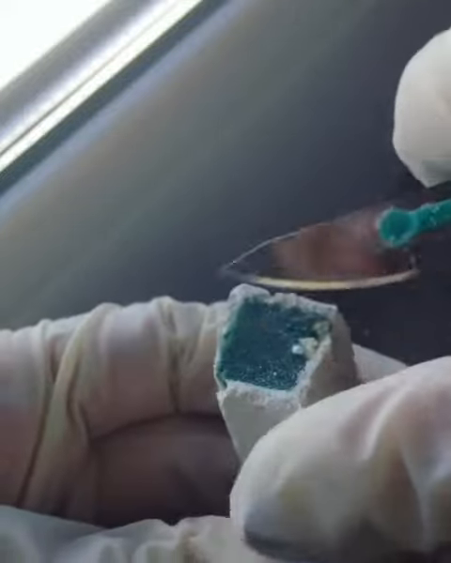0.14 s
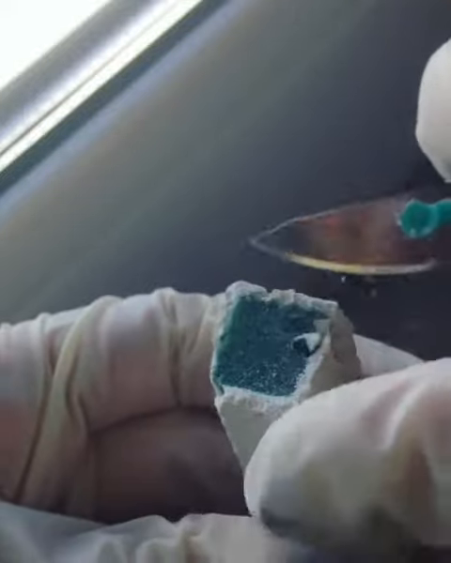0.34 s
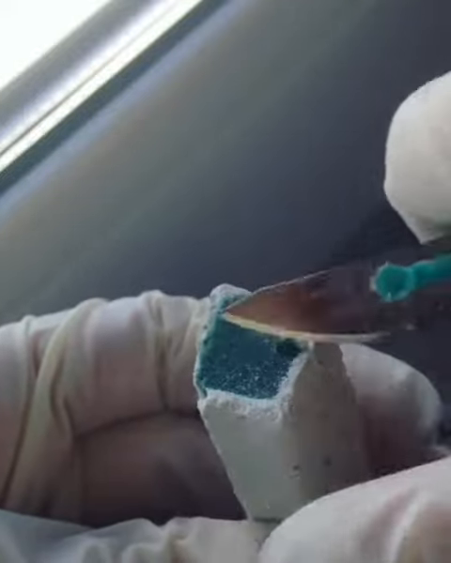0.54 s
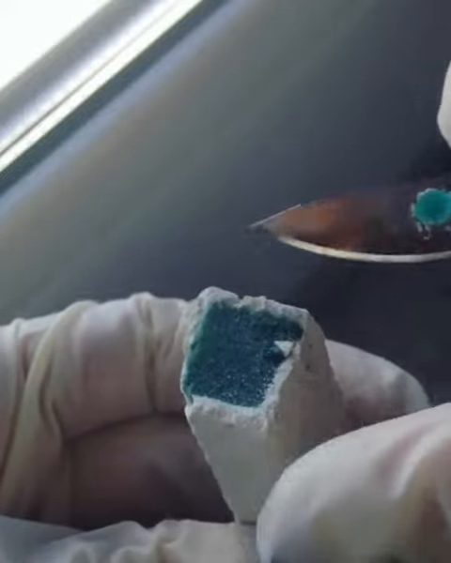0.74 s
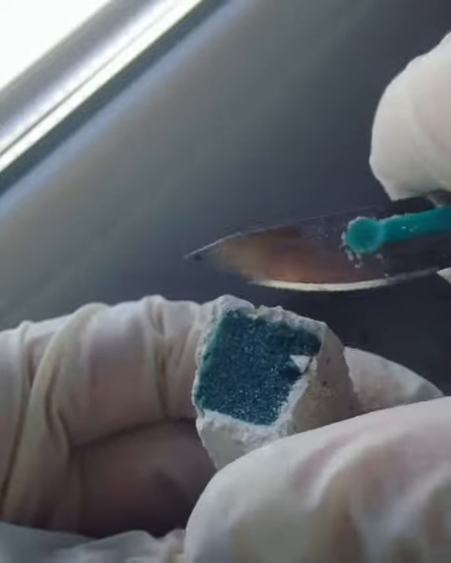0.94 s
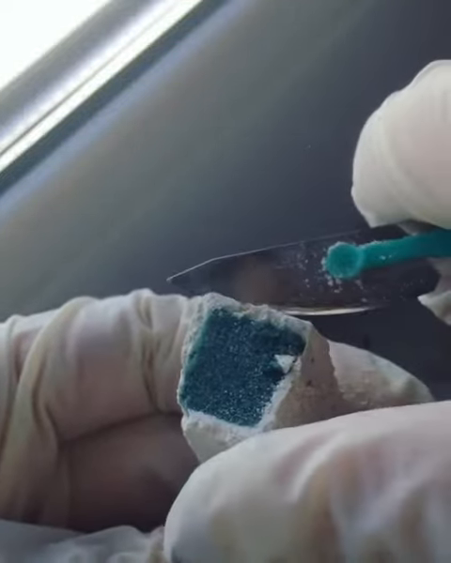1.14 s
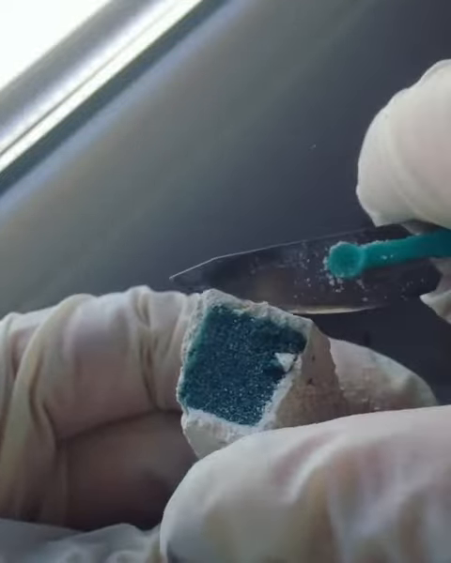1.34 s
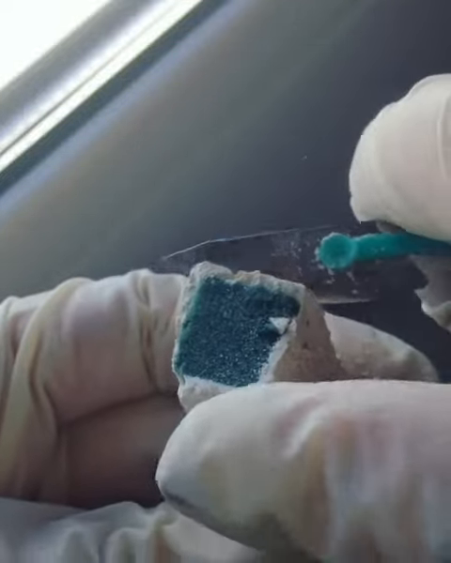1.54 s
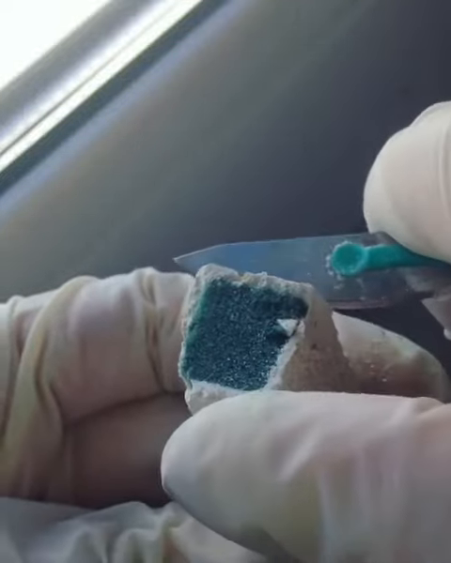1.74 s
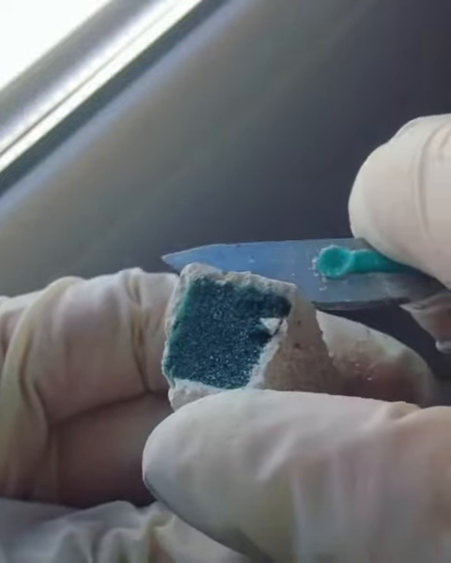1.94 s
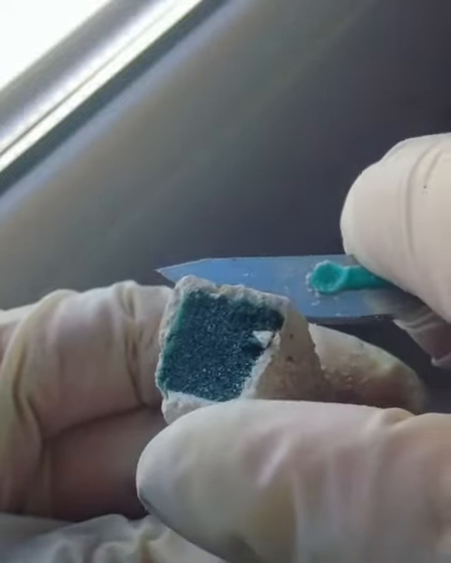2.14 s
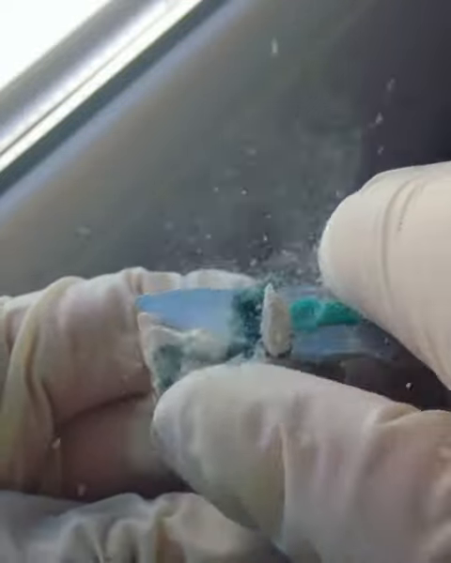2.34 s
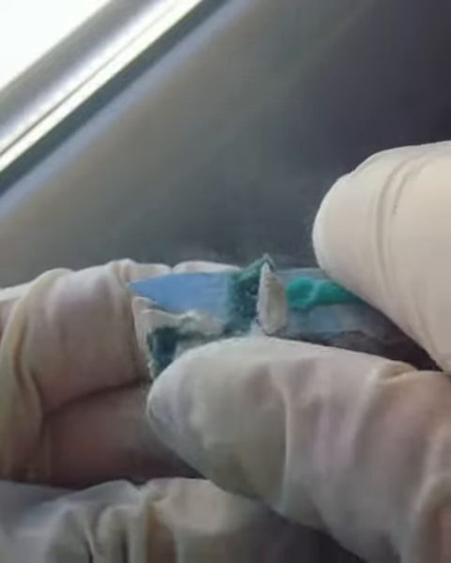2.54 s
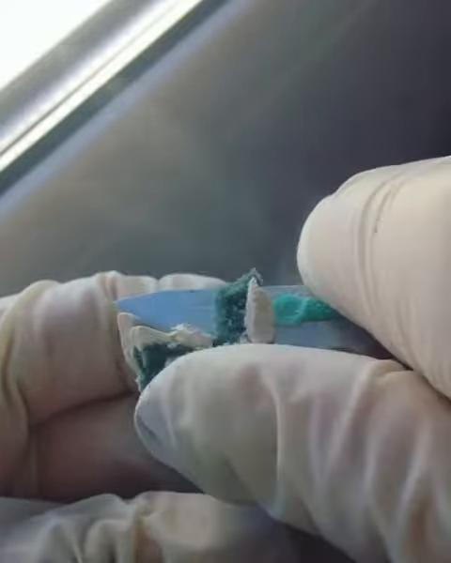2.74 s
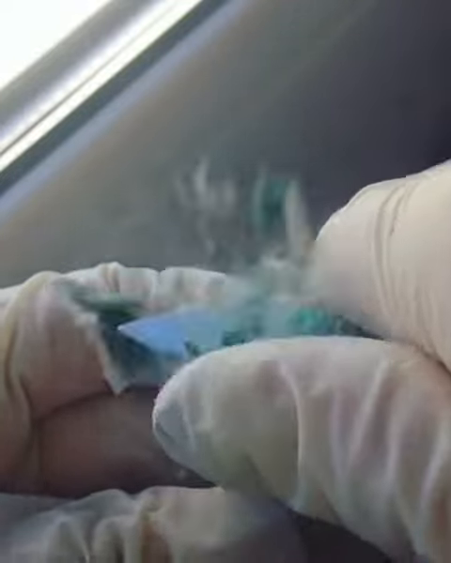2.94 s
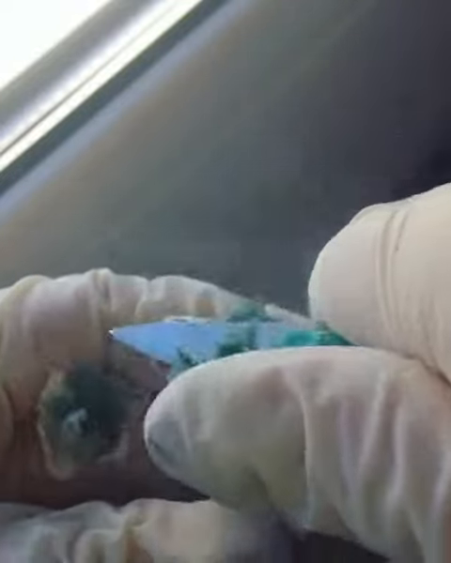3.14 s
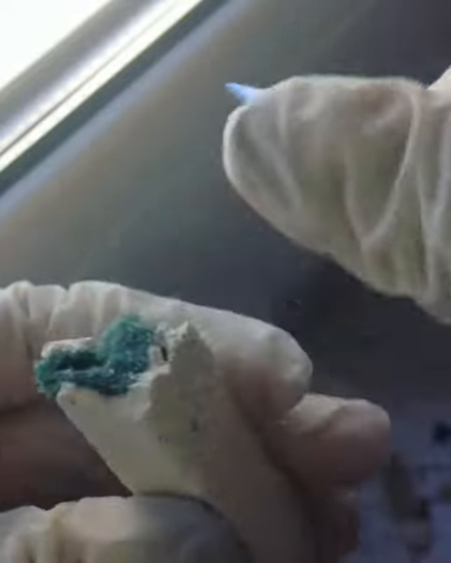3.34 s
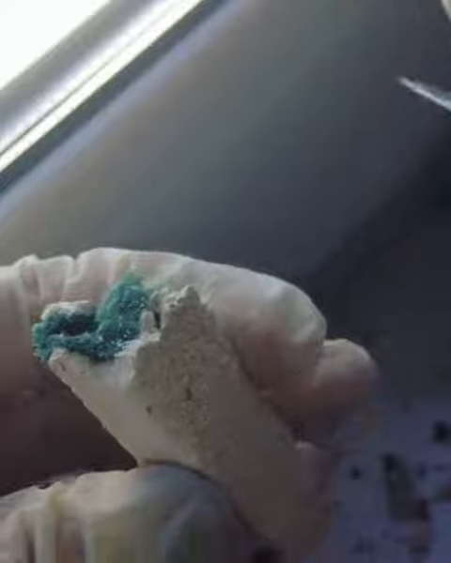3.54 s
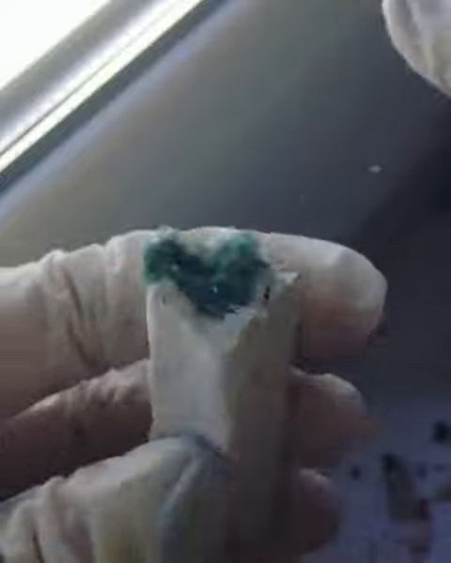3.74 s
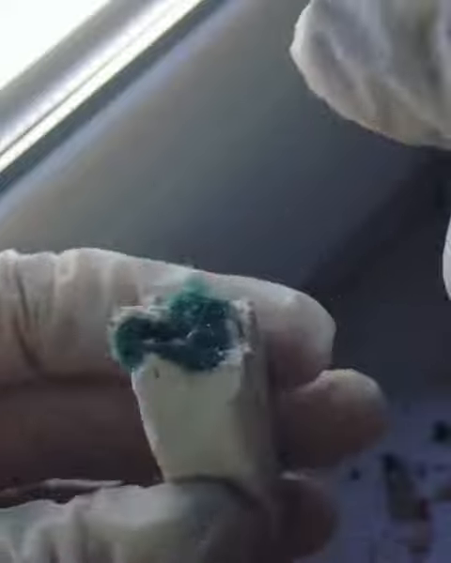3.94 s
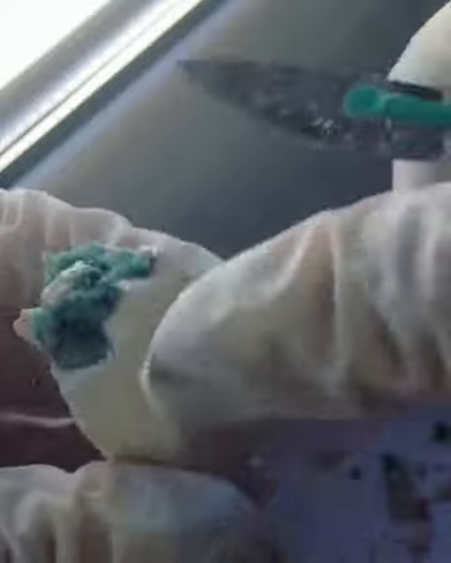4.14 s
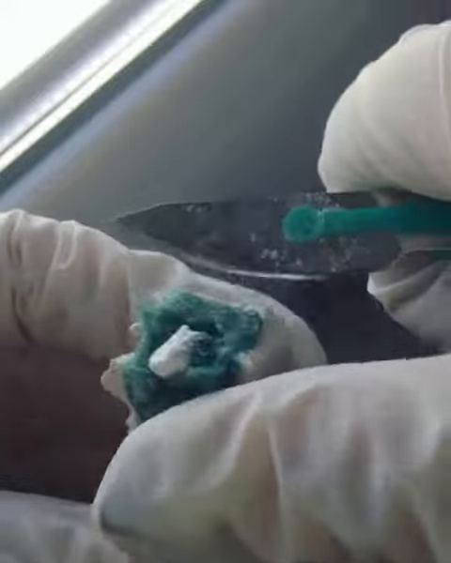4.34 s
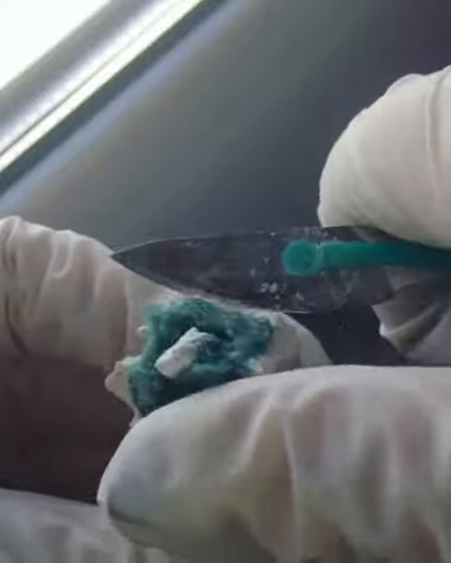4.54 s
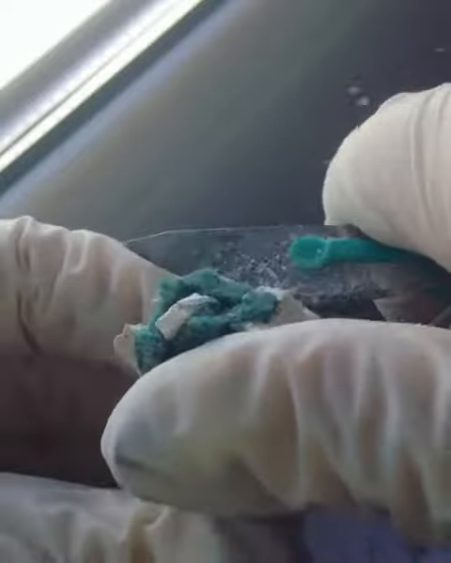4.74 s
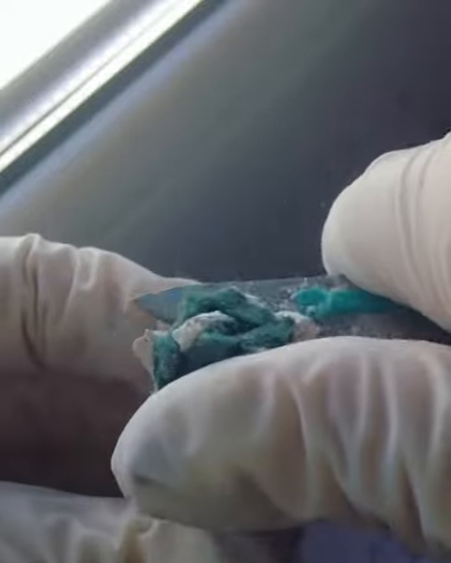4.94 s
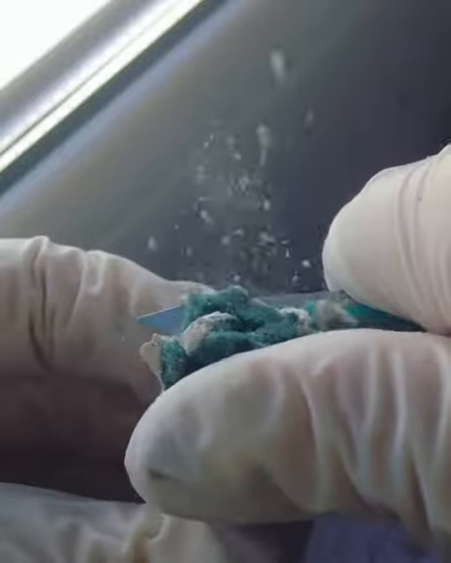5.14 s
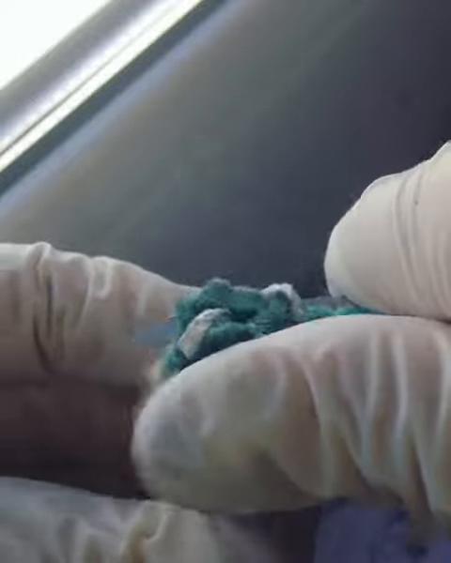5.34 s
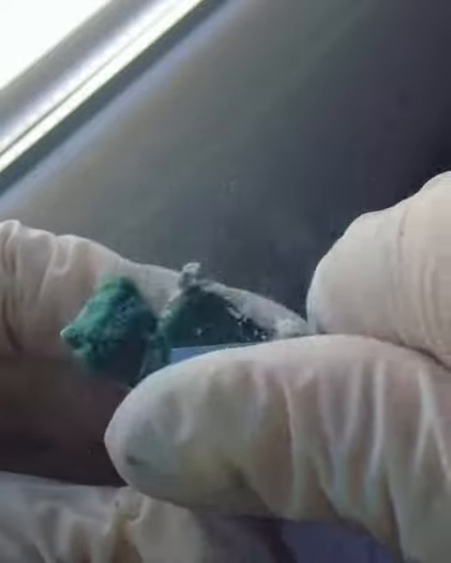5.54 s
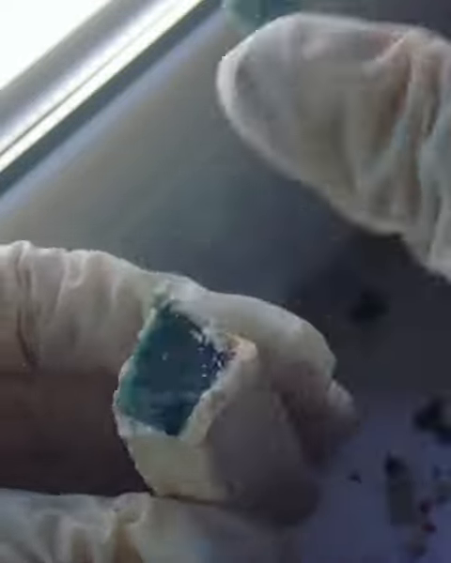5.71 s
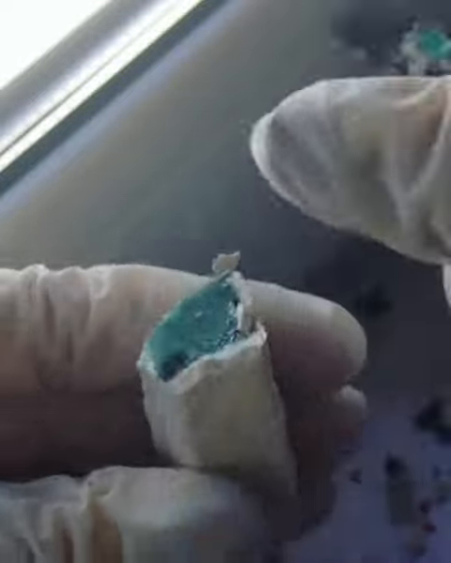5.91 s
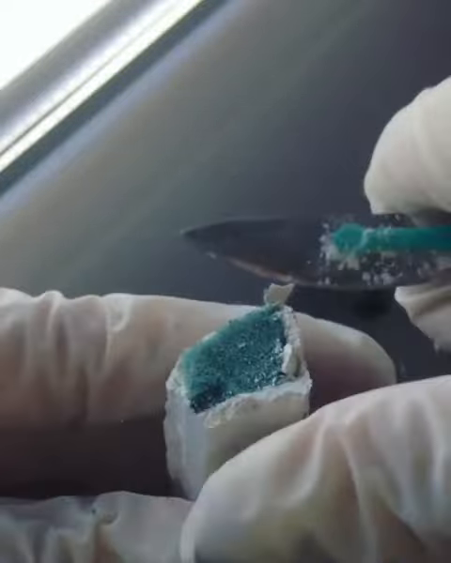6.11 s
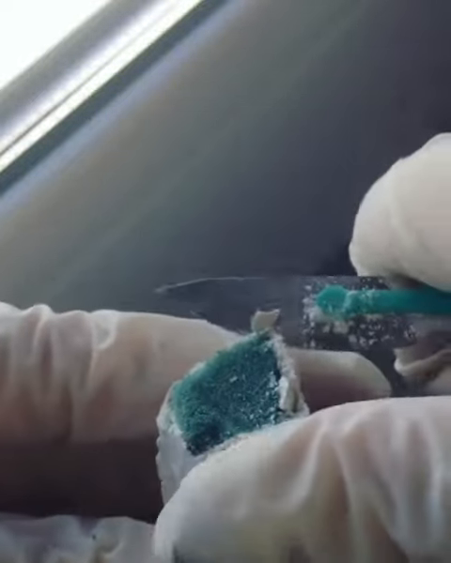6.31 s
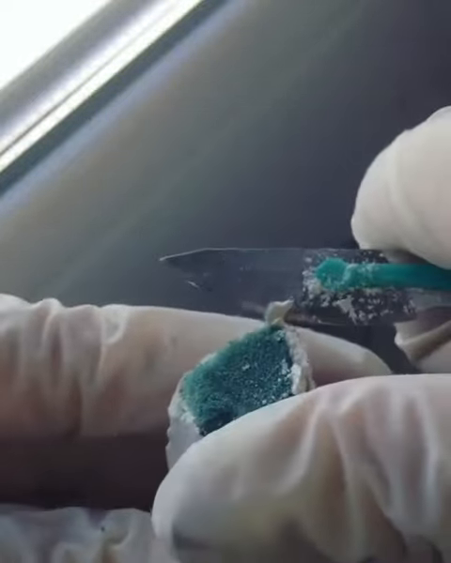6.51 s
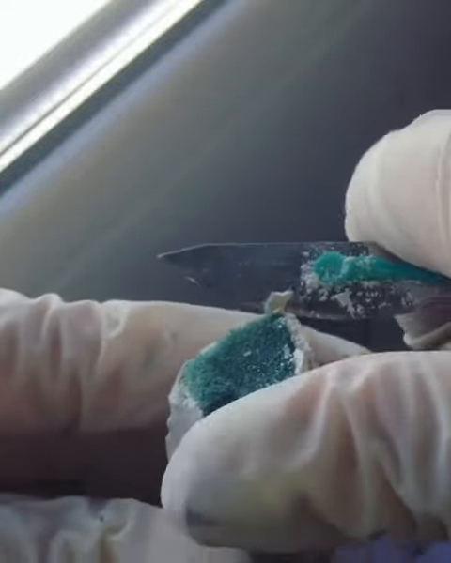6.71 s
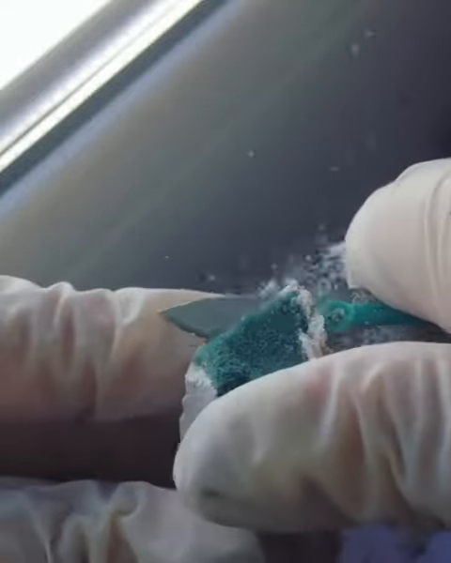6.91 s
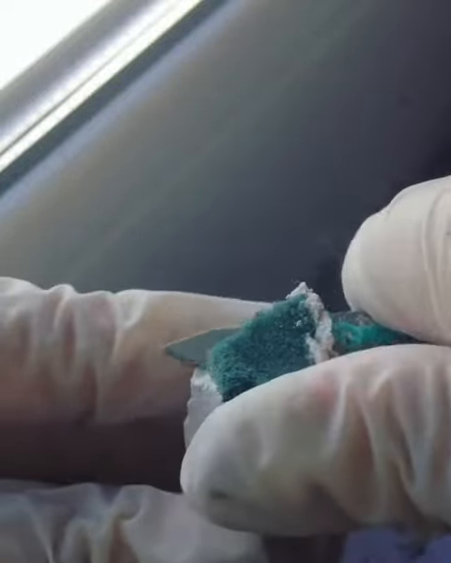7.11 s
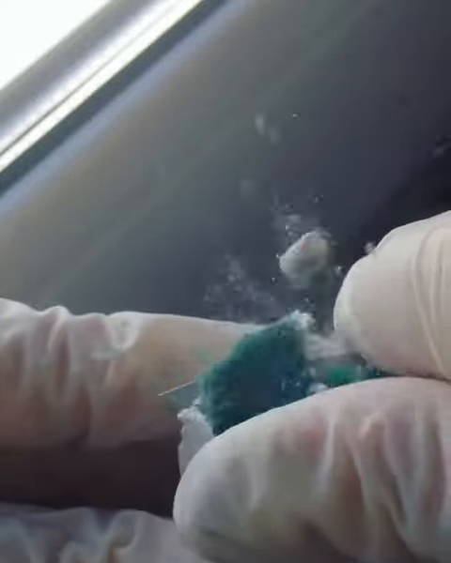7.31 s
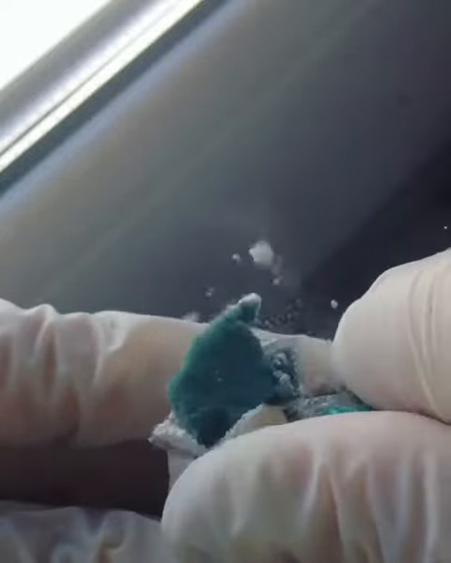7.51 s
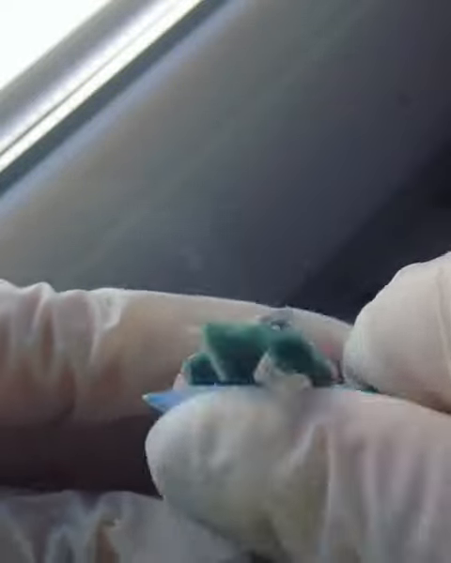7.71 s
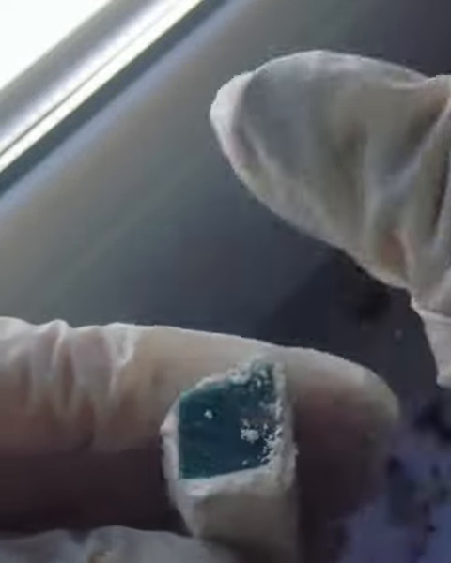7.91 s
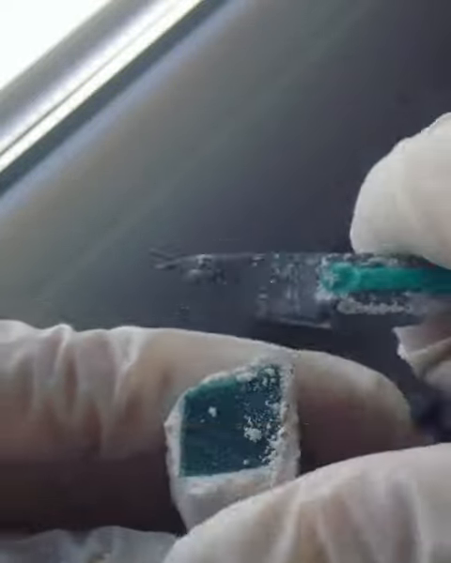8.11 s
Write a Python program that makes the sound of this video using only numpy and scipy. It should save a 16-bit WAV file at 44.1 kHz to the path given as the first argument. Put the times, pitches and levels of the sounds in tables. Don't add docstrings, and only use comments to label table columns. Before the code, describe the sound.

A close microphone in a quiet, dry room with faint low rumble, soft hiss and barely audible hum. In the first 0.8 s a thin blade makes four short, bright scratchy shaves on a dry block, with tiny ticks. Near silence follows, only faint flecks until 2.4. At 2.5 a hard, crisp double crack bursts out, grit spilling, with a tiny glassy clink at 2.6; another sharp crack at 3.1 sends crumbs tapping and rolling to 3.6, and a low handling bump comes at 3.75. After a lull, a very sharp snap at 4.87 starts crackling and squeezed grit up to a crunch at 5.55. Pieces clatter and roll around 5.8, a dull hollow knock at 5.95, then sparse taps and a very faint sinking pipe tone near 6.7. From 6.9 to 7.7 dense brittle crunches resume, then bright taps at 7.8-7.9 and trickling crumbs to the end, about 8.4.

```python
import sys
import numpy as np
from scipy import signal
from scipy.io import wavfile
from scipy.ndimage import uniform_filter1d

SR = 44100
rng = np.random.default_rng(int(sys.argv[2]) if len(sys.argv) > 2 else 0)


def transcribe(signal):
    frames = np.atleast_2d(signal).T
    limited = np.clip(frames, -1, 1)
    pcm = np.round(limited * 32767).astype(np.int16)
    wavfile.write(sys.argv[1], SR, pcm)


def elevation(decibels):
    levels = np.asarray(decibels, float)
    return 10 ** (levels / 20)


N = 364266

# time_s, level_db
RUMBLE_LEVEL = [(0, -69), (.35, -75), (.8, -71.5), (2.2, -73), (2.7, -69), (3.72, -68.5), (3.8, -52.5),
                (4.05, -68.5), (4.4, -72), (5.0, -70), (8.26, -68.5)]
# frequency_hz, density_db
RUMBLE_COLOUR = [(12, -50), (20, -19.5), (91, -5.5), (164, -6.5), (268, -10.5), (387, -15.5), (900, -32.5),
                 (1980, -120)]
# frequency_hz, density_db
HISS_COLOUR = [(240, -33.5), (400, -4.5), (1690, -15), (2120, -15), (7170, -15.5), (12600, -26),
               (14000, -19.5)]
# pitch_hz, waver_hz, level_db
HUM_TONES = [(168, 3, -74), (219.5, 7, -79)]

# start_s, bite_s (time to full bite), level_db, length_s, lift_off_db
STROKES = [
    (0.008, 0.0021, -46.5, 0.042, -59),
    (0.094, 0.066, -48.5, 0.11, -65),
    (0.448, 0.011, -44, 0.071, -54.5),
    (0.717, 0.016, -47, 0.083, -49.5),
]
# middle_s, level_db, length_ms
CATCHES = [(0.01, -53, 3.7), (0.019, -41.5, 2.3), (0.037, -56, 1.9), (0.097, -59, 2.1), (0.109, -57, 2),
           (0.119, -56, 2), (0.139, -50, 4), (0.164, -47, 8.6), (0.186, -34.5, 5), (0.462, -39, 1.5),
           (0.471, -33.5, 1.2), (0.478, -42, 2), (0.489, -50, 4), (0.501, -52, 2), (0.504, -51, 0.64),
           (0.509, -42, 3.9), (0.72, -56, 2), (0.74, -37, 1.6), (0.744, -38, 1), (0.767, -45, 2.3),
           (0.775, -27, 1.4), (0.787, -38.5, 3.2), (0.03, -49, 8.8), (0.235, -72, 42), (0.815, -70, 23),
           (0.54, -80, 33)]
# pitch_hz, width_hz, level_db
BLADE_MODES = [(3700, 330, -10.5), (4800, 540, -5.5), (6900, 260, 1), (7700, 690, 0), (9000, 890, -10.5),
               (11270, 270, -3.5), (12600, 600, -12), (13600, 400, -12)]
TOUCH_DB, EDGE_S = -19, 0.0039
LIFT_DB, AFTER_S, AFTER_DB = -73, 0.1, -89

# frequency_hz, density_db
FINE_COLOUR = [(900, -45), (1800, -24), (3400, -14), (6200, -4), (9200, -1), (11000, 0), (14000, -3)]
# frequency_hz, density_db
COARSE_COLOUR = [(60, -52), (250, -5.5), (600, -6), (1300, -3), (2200, -1), (3500, 3.5), (6000, 2),
                 (12000, -21)]
# frequency_hz, density_db
EDGE_COLOUR = [(1500, -38), (4000, 3), (6500, 11), (9000, 3), (12500, 0.5), (15000, -10.5)]

# start_s, peak_db, ring_hz, edge_db (relative), body_db (relative)
SNAPS = [(4.7401, -33, 9260, 1, -13.5), (4.8654, -5, 10130, -21, -23), (4.897, -29, 9670, -18, -25),
         (4.964, -18, 9700, -2, -2.5), (5.0111, -38.5, 3380, 15.5, 9), (5.0281, -31, 3230, 16, 6),
         (5.0325, -22, 9170, 11, 2.5), (5.1952, -34, 9000, 0, -19), (5.292, -16, 9000, 6, 3.5),
         (5.4338, -30, 10700, 2.5, -43.5), (6.9158, -32.5, 11500, 14.5, 10), (7.238, -32, 9500, -6, -19),
         (7.249, -32, 2800, -10, 4.5), (7.4565, -16.5, 8000, 9.5, 7), (7.5085, -39, 10000, 5.5, -19),
         (7.6014, -19, 8000, 2, 3), (7.6593, -21, 7600, -3, 3), (7.721, -23, 7840, 1.5, -3.5)]
# start_s, peak_db, ring_hz, edge_db (relative), body_db (relative)
CRACKS = [(0.4694, -24.5, 7240, -15, -32), (0.7856, -28, 8450, -9, -25), (2.4676, -11, 11700, 5, -5),
          (2.5153, -18.5, 2900, 6, -6), (2.484, -13, 10900, -11, -20), (3.1255, -26, 3580, 10, 7.5),
          (3.1272, -8.5, 6740, 2, -9.5), (5.5465, -12, 9000, 4.5, 3.5), (5.5649, -27.5, 5550, -4, -20),
          (7.0382, -15, 10300, 4.5, -4), (7.0796, -15, 11000, 4, -6), (7.1884, -30, 9050, 9.5, 5.5),
          (7.2556, -28, 9300, -2, -10)]
# start_s, peak_db, ring_hz, edge_db (relative), body_db (relative)
CRUNCHES = [(0.0154, -31, 6500, -12, -13), (0.1817, -37, 3520, -14, -13), (0.4607, -31.5, 4700, -2, -26),
            (0.5082, -31, 7700, 0.5, -32), (0.7385, -28, 10000, -1, -21), (0.7741, -22.5, 4700, 3, -17.5),
            (1.4554, -32.5, 6900, -38, -16), (2.4821, -12, 3110, 7.5, -8), (2.5389, -46, 10060, -9, -18),
            (6.9959, -23, 9500, 5, 2), (7.2649, -41, 2960, -6, 4.5), (7.2868, -36, 1396, -11, 6),
            (7.2962, -30.5, 9900, -2, -23), (7.4313, -27.5, 12100, -11, -17), (7.6711, -26, 8700, 9.5, 2)]
# start_s, peak_db, ring_hz
FLECKS = [(0.416, -48, 6700), (0.9731, -44, 6500), (1.016, -49, 8400), (1.088, -59, 2960),
          (1.249, -58, 3330), (1.5626, -49, 4100), (1.697, -56.5, 6500), (1.774, -56, 3400),
          (2.432, -49, 3200), (5.078, -40, 6000)]
SNAP_MS, CRACK_MS, CRUNCH_MS = 2.1, 2.63, 4.6

# start_s, fine_db, coarse_db, t60_s
POURS = [(2.483, -38.5, -37, 0.25), (2.634, -66, -66, 2.3), (2.633, -54, -58, .09), (5.79, -62, -54, 0.31),
         (2.73, -54.5, -48, 0.45), (3.129, -48.5, -46.5, 0.34), (3.313, -61.5, -58, 0.98),
         (3.483, -67, -56, 0.53), (3.757, -61, -49, 0.47), (4.871, -49, -58.5, 0.21),
         (4.969, -57, -62, 1.1), (5.298, -67, -65.5, 3.5), (5.435, -37.5, -47.5, 0.22),
         (5.551, -42, -44, 0.2), (5.775, -60, -51.5, 0.78), (5.994, -63.5, -61.5, 1.4),
         (6.922, -67, -62, 0.35), (7.002, -59, -83, .8), (7.19, -48.5, -75, 0.49), (7.458, -42, -45, 0.18),
         (7.607, -62, -59.5, 0.63), (7.663, -43, -41.5, 0.14), (7.798, -68, -58, 1.15),
         (7.877, -61, -52, 0.33), (8.188, -61, -55.5, 2.8)]
# middle_s, fine_db, coarse_db, half_width_s
SWELLS = [(1.08, -69, -72.5, 0.082), (1.69, -76, -76.5, 0.3), (2.46, -72, -83, 0.16),
          (3.1, -69.5, -96, 0.39), (3.62, -67.5, -61.5, 0.85), (3.9, -62, -62.5, 0.12),
          (4.219, -70, -70, 0.85), (4.799, -73.5, -73, 0.53), (5.063, -46.5, -64, 0.072),
          (5.18, -49, -68, 0.09), (5.76, -62.5, -60, 0.1), (6.345, -77, -66.5, 0.027),
          (6.415, -63, -62, 0.061), (6.532, -69, -63, .15), (7.08, -57, -63, 0.21),
          (7.254, -47, -48.5, 0.047), (7.44, -65.5, -65, 0.94), (7.734, -55, -51, 0.045),
          (8.055, -64, -64, 0.072), (8.14, -66, -64.5, 0.17), (0.23, -75, -69, 0.13),
          (0.83, -74, -68.5, 0.12), (5.49, -45, -77, 0.083), (3.39, -66, -53, 0.033),
          (6.33, -66.5, -63, .015), (6.57, -71, -65, 0.035), (7.3, -53.5, -52.5, 0.035)]
# pitch_hz, width_hz, level_db
CRUMB_MODES = [(1320, 210, -6), (2150, 75, 2), (2950, 430, -2)]
POUR_RISE_S, EBB_DB, DUST_DB = .006, -21.5, -86.5

# start_s, peak_db, ring_hz
CHIPS = [(0.3057, -62, 8950), (2.701, -57, 4010), (2.737, -35, 6500), (2.83, -38, 8000),
         (2.987, -54, 10800), (3.039, -53, 10700), (3.256, -51, 2420), (3.276, -52, 3010),
         (3.323, -43, 490), (3.388, -39, 6400), (3.488, -29.5, 2100), (3.513, -42, 2100),
         (3.591, -48, 5000), (3.602, -59, 3500), (3.856, -42, 6180), (4.842, -52, 3340), (5.123, -47, 6900),
         (5.164, -43, 6440), (5.233, -55.5, 1700), (5.441, -34, 11000), (5.449, -30, 4200),
         (5.454, -33, 8500), (5.465, -41, 8000), (5.523, -42, 3000), (5.578, -47, 4500), (5.674, -52, 8000),
         (5.775, -26.5, 4500), (5.801, -32, 2500), (5.84, -37, 2000), (5.877, -45, 6000),
         (5.893, -49.5, 6500), (6.324, -51, 3530), (6.378, -52, 6400), (6.402, -54, 8700),
         (6.418, -53, 7500), (6.534, -46, 4100), (6.567, -51, 4000), (6.641, -56, 3940), (6.652, -51, 4630),
         (6.941, -40, 3300), (7.014, -40, 9500), (7.025, -43, 9500), (7.136, -40, 10500),
         (7.243, -30, 10500), (7.257, -36, 9500), (7.363, -42, 9360), (7.405, -51, 1680),
         (7.634, -46, 7000), (7.695, -36, 7300), (7.707, -33, 2480), (7.731, -46, 1000), (7.742, -35, 7000),
         (7.853, -43, 7910), (7.859, -37, 1790), (7.882, -31, 2600), (7.924, -50, 3460), (7.979, -47, 6800),
         (8.102, -50, 7500), (8.198, -41, 2150), (8.248, -40, 2200),
         (2.47, -19, 2250), (2.486, -14, 8300), (3.13, -11, 8500), (3.344, -43.5, 8000),
             (5.5, -41.5, 6000), (6.742, -54, 2300), (6, -38, 4200), (7.478, -31, 9000), (7.466, -32, 2600)]
# start_s, peak_db, pitch_hz
JOLTS = [(2.466, -42, 226), (2.482, -34, 106.5), (3.127, -41.5, 129), (3.477, -43.5, 342),
         (3.752, -27.5, 333), (3.774, -37.5, 145), (4.865, -49, 92.6), (5.032, -39.5, 121),
         (5.297, -37.5, 116), (5.547, -31, 374), (6.994, -41, 100), (7.037, -36.5, 101),
         (7.079, -40.5, 120), (7.46, -40, 128), (7.602, -41.5, 124), (7.659, -43, 143), (5.549, -31, 290),
         (8.215, -44, 340), (0.776, -51, 400), (7.0, -41, 424)]

# start_s, peak_db, ring_hz, edge_db (relative), body_db (relative)
TAPS = [(2.5776, -41, 5168, -10, 4.5), (2.7472, -25, 3600, -26, 3), (2.7858, -33.5, 6440, -11, -5),
        (3.4778, -24.5, 2720, 3, 7), (3.752, -27, 650, 6.5, 7.5), (3.7741, -32, 7750, 7, 5),
        (3.9213, -41.5, 5160, -13, -8), (5.7089, -36, 4260, 2, -36), (5.783, -21, 1900, -25, -15),
        (5.8559, -30.5, 9800, -3, -11), (5.9888, -37, 3440, -6, -0.5), (6.0449, -40.5, 2720, -15, -14),
        (6.057, -45.5, 6000, -2, -16), (6.148, -43.5, 3170, 7, -21), (6.1579, -42.5, 2920, -16, 1.5),
        (6.3444, -48.5, 1420, 14.5, 11), (6.4984, -42, 6740, -22, 1), (6.5449, -45, 4000, -12, 6),
        (6.7179, -42, 2840, 4, 0), (7.7932, -19, 2950, -35, -7.5), (7.817, -44, 7000, -7, -13),
        (7.8732, -13.5, 3440, -21, -44), (7.8929, -35, 1710, -12, -30), (8.1829, -30.5, 1630, 0, 4.5)]
# start_s, peak_db, ring_hz, edge_db (relative), body_db (relative)
TUMBLES = [(2.6306, -32, 8000, 9.5, -4), (2.7207, -44, 2840, -4, 8.5), (2.7666, -46.5, 674, -10, 6.5),
           (3.3077, -30.5, 1500, 5, 6), (3.3506, -38, 2200, 6.5, -6), (3.4125, -39.5, 5050, 3, -1.5),
           (3.4607, -41, 3600, 13.5, 7), (3.5681, -48, 3160, 17, 13), (3.6502, -36.5, 5600, -2, -16),
           (3.8375, -45, 1600, -5, -4), (5.7201, -33.5, 3030, -26, -13), (5.7701, -18.5, 1970, 0, -2),
           (5.8265, -31, 5600, 2, -6), (5.9414, -32.5, 930, -10, -16), (6.0973, -47.5, 1300, 7.5, 1.5),
           (6.425, -51.5, 756, -20, 2), (6.5217, -40, 4090, -16, -26), (6.6178, -50.5, 1430, -17, 0),
           (8.0434, -45.5, 4740, -15, 0), (8.0559, -37.5, 4260, 4.5, -8), (8.1895, -26.5, 2150, -7, -1.5),
           (8.217, -43, 466, 6, -2), (8.2393, -35.5, 2100, 4.5, -17)]
# start_s, peak_db, ring_hz, edge_db (relative), body_db
THUDS = [
    (4.8655, -32, 1150, -31, -11),
    (6.433, -47, 450, -30, -7),
    (5.549, -30, 940, -29, -5),
    (3.128, -29, 800, -28, -10.5),
    (7.082, -35.5, 610, -30, -7),
]
TAP_MS, TUMBLE_MS = 1.54, 3.5
# pitch_hz, width_hz, level_db
BOARD_MODES = [(650, 53, -7), (1138, 45, 0), (1390, 69, -4), (1530, 35, -10), (2100, 28, 1), (2320, 37, -5),
               (2950, 110, -14), (4100, 100, -18)]

# pitch_hz, level_db, t60_s
CLINK_MODES = [(1240, -4.5, 0.07), (1840, -5.5, 0.053), (2605, -12, 0.39), (2730, -30, 0.18),
               (4800, -8.5, 0.16), (5520, -19, 0.16), (5680, -6, 0.13), (6790, 1.5, 0.055),
               (7750, 2, 0.049), (8400, -3, 0.085), (9150, -11, .07), (10000, -7.5, 0.11),
               (11950, 1, 0.073), (13000, -6, .03)]
# start_s, level_db, t60_s
ROLLS = [
    (3.31, -58, .2),
    (3.48, -56, .25),
    (5.772, -43.5, 0.27),
    (5.862, -56, 0.34),
    (7.797, -57, .25),
    (8.19, -52, .3),
]
# pitch_hz, level_db, t60_s
KNOCK_MODES = [(619, -8, .035), (980, 5, .025), (1109, -6, .075), (1846, -14, .04), (2200, -9, .05)]
# time_s, pitch_hz, level_db
MOAN_PATH = [
    (6.58, 480, -87),
    (6.64, 467, -66.5),
    (6.8, 445, -68),
    (6.86, 430, -77),
]
# frequency_hz, t60_s
ROOM_T60 = [(200, 0.31), (2000, 0.04), (12000, 0.025)]


def evened(x):
    return x / np.sqrt(np.mean(x ** 2) + 1e-20)


def peaked(x):
    return x / (abs(x).max() + 1e-12)


def noise():
    return rng.standard_normal(N)


def read(points, hz):
    f, value = np.transpose(points)
    return np.interp(np.log(hz + 1), np.log(f + 1), value)


def curves(rows):
    s, *columns = np.transpose(rows)
    return [np.interp(np.arange(N) / SR, s, c) for c in columns]


def add(mix, s, sound):
    part = mix[max(round(s * SR), 0):][:len(sound)]
    part += sound[:len(part)]


def coloured(x, points, size=2048):
    log_gain = np.log(elevation(read(points, abs(np.fft.fftfreq(size, 1 / SR)))))
    taps = np.fft.ifft(np.exp(np.conj(signal.hilbert(log_gain)))).real[:size // 2]
    return signal.oaconvolve(x, taps)[:len(x)]


def resonate(x, hz, width):
    r = np.exp(-np.pi * width / SR)
    if np.ndim(hz) == 0:
        return 2 * signal.lfilter([1 - r], [1, -r * np.exp(2j * np.pi * hz / SR)], x + 1e-18).real
    turn = np.exp(2j * np.pi * np.cumsum(hz) / SR)
    return 2 * (turn * signal.lfilter([1 - r], [1, -r], x / turn + 1e-18)).real


def fractures(count, per_s, spread_db):
    when, size, sign = rng.random((count, 3)).T
    height = elevation(spread_db * np.minimum(-np.log(size + 1e-9), 4))
    return (when < per_s / SR) * height * np.sign(sign - .5)


def lumps(per_s, depth_db):
    return elevation(depth_db * evened(uniform_filter1d(noise(), int(SR / per_s))))


def grains(drive, colour, low_hz, high_hz, count, octaves, per_s, depth_db):
    kind, unevenness, out = rng.integers(0, count, N), lumps(per_s, depth_db), np.zeros(N)
    for k, hz in enumerate(np.geomspace(low_hz, high_hz, count)):
        edges = np.clip(hz * 2 ** (np.array([-.5, .5]) * octaves), 50, .45 * SR)
        b, a = signal.butter(1, edges, "band", fs=SR)
        out += signal.lfilter(b, a, drive * (kind == k) * np.roll(unevenness, k * N // count))
    return evened(coloured(out, colour))


def bursts(rows, ms, rise, steep, rattle, sharpness):
    out, t = np.zeros(N), np.arange(2048) / SR
    length = ms * 0.00099
    for s, db, hz, edge_db, body_db in rows:
        burst = fractures(count=len(t), per_s=15000, spread_db=3.5)
        shape = (1 - np.exp(-(t / (rise * length)) ** 2)) * np.exp(-(t / length) ** steep)
        after = rattle * np.exp(-t / (2.86 * length)) * (t > length / 2)
        dull = resonate(burst * after, 1700., 2900.0)
        width = hz / sharpness + 250
        shard = resonate(resonate(burst * shape, hz, width), hz, width)
        sound = elevation(edge_db - 4.5) * peaked(coloured(burst * shape, EDGE_COLOUR, size=256))
        sound += elevation(body_db - 1.0) * peaked(coloured(burst * shape + 1.2 * dull, COARSE_COLOUR, size=512))
        add(out, s, elevation(db) * (sound + elevation(-5) * peaked(shard)))
    return out


def beating(hz, t, chance):
    pair_hz = hz * (1.004 + .01 * chance)
    return np.sin(2 * np.pi * (hz * t + chance)) + .45 * np.sin(2 * np.pi * pair_hz * t)


def struck(s, level_db, modes):
    out, t = np.zeros(N), np.arange(8192) / SR
    ring = sum(elevation(level_db + db - 60 * t / t60) * beating(hz, t, rng.random()) for hz, db, t60 in modes)
    add(out, s, ring * np.minimum(t / 0.00062, 1))
    return out


def rumble():
    return evened(coloured(noise(), RUMBLE_COLOUR, size=8192)) * elevation(curves(RUMBLE_LEVEL)[0])


def hiss():
    return elevation(-75) * evened(coloured(noise(), HISS_COLOUR))


def waver(hz, waver_hz):
    drift = evened(uniform_filter1d(noise(), SR // 20))
    phase = 2 * np.pi * np.cumsum(hz + waver_hz * drift) / SR
    return evened(np.sin(phase) * lumps(per_s=14, depth_db=3.))


def hum():
    tones = sum(elevation(db) * waver(hz, waver_hz) for hz, waver_hz, db in HUM_TONES)
    return tones * elevation(curves([(2.2, -1), (3.0, -3)])[0])


def pressure():
    t, out = np.arange(2 * SR) / SR, np.zeros(2 * SR)
    for s, bite, db, length, end_db in STROKES:
        steps = [-EDGE_S, 0, bite, length, length + 2 * EDGE_S, length + AFTER_S, length + 2 * AFTER_S]
        levels = [-110, db + TOUCH_DB, db, end_db, LIFT_DB, AFTER_DB, -110]
        out += elevation(np.interp(t, s + np.array(steps), levels))
    for s, db, ms in CATCHES:
        out += elevation(db) * np.exp(-((t - s) * 1000 / ms) ** 2)
    return np.pad(out, (0, N - len(out)))


def blade(drive, unevenness, grip):
    out = np.zeros(len(drive))
    for hz, width, db in BLADE_MODES:
        own = np.roll(grip, 3 * round(hz))
        bent = hz * (1 + .03 * own) if len(grip) > 1 else hz
        force = drive * np.roll(unevenness, round(hz)) * elevation(2.7 * own)
        out += elevation(db) * resonate(resonate(force, hz, 6.0 * width), bent, width)
    return out


def strokes(breaks):
    drive, unevenness = fractures(count=N, per_s=9000, spread_db=1.5), lumps(per_s=230, depth_db=3.0)
    push, grip = pressure(), evened(uniform_filter1d(np.log(unevenness[:SR]), 1300))
    scrape = 0.55 * evened(coloured(drive * unevenness, FINE_COLOUR)) * push
    scrape += elevation(-24) * evened(coloured(drive * unevenness ** 2, COARSE_COLOUR)) * push
    sung = blade(drive[:SR] * push[:SR], unevenness[:SR], grip)
    sung = sung / np.std(blade(drive[:SR], unevenness[:SR], grip))
    rung = blade(elevation(-14.5) * breaks, unevenness, np.zeros(1))
    return rung + np.pad(sung, (0, N - SR)) + scrape


def cracks():
    flecks = [row + (4, -2.5) for row in FLECKS]  # edge_db, body_db
    sizes = (SNAPS, SNAP_MS), (CRACKS + flecks, CRACK_MS), (CRUNCHES, CRUNCH_MS)
    return sum(bursts(rows, ms, rise=.3, steep=1.68, rattle=.15, sharpness=5.3) for rows, ms in sizes)


def flow():
    t, power = np.arange(0, N, 32) / SR, elevation(2 * DUST_DB)
    for s, fine_db, coarse_db, t60 in POURS:
        shape = np.clip((t - s) / POUR_RISE_S + 1, 0, 1) * elevation(-60 * np.maximum(t - s, 0) / t60)
        power = power + (elevation(np.array([[fine_db], [coarse_db]])) * shape) ** 2
    for s, fine_db, coarse_db, half in SWELLS:
        power = power + elevation(np.array([[fine_db], [coarse_db]]) + EBB_DB * abs(t - s) / half) ** 2
    return [np.interp(np.arange(N) / SR, t, np.sqrt(p)) for p in power]


def grit():
    fine_flow, coarse_flow = flow()
    dust = fractures(count=N, per_s=15000, spread_db=3.0) * lumps(per_s=50, depth_db=2.5)
    fine = grains(dust, FINE_COLOUR, 2700, 14000, count=7, octaves=1.0, per_s=110, depth_db=4.0)
    ticks = fractures(count=N, per_s=90, spread_db=3.)
    fine = fine + .16 * evened(coloured(ticks, EDGE_COLOUR, size=256))
    crumbs = fractures(count=N, per_s=3000, spread_db=0.0) * lumps(per_s=71, depth_db=1.0)
    hollow = sum(elevation(db) * resonate(crumbs, hz, width) for hz, width, db in CRUMB_MODES)
    coarse = grains(crumbs, COARSE_COLOUR, 500, 5000, count=9, octaves=0.49, per_s=70, depth_db=4.0)
    coarse = coarse + 0.38 * evened(hollow)
    return fine * fine_flow * elevation(2.5) + evened(coarse) * coarse_flow * elevation(-0.82)


def chips():
    rows = [row + (-8.5, -13) for row in CHIPS]  # edge_db, body_db
    return bursts(rows, 1.6, rise=0.14, steep=0.89, rattle=.2, sharpness=6.1)


def jolts():
    out, t = np.zeros(N), np.arange(4096) / SR
    for s, db, hz in JOLTS:
        push = np.cos(2 * np.pi * hz * t) * np.minimum(t / 0.0026, 1) * np.exp(-t * hz / 0.59)
        knocking = np.sin(2 * np.pi * 3.1 * hz * t) * np.exp(-t * 2.0 * hz / 1.7)
        add(out, s, elevation(db) * (peaked(push) + 0.35 * knocking))
    return signal.sosfilt(signal.butter(2, 65, "high", fs=SR, output="sos"), out)


def landings():
    sizes = (TAPS, TAP_MS), (THUDS, TAP_MS), (TUMBLES, TUMBLE_MS)
    taps, thuds, tumbles = [bursts(rows, ms, rise=0.046, steep=0.91, rattle=0.38, sharpness=2.95)
                            for rows, ms in sizes]
    board = sum(elevation(5 + db) * resonate(taps + tumbles, hz, width) for hz, width, db in BOARD_MODES)
    return taps + thuds + tumbles + board


def clink():
    return struck(2.6302, -38, CLINK_MODES)


def rolling():
    t = np.arange(N) / SR
    amount = sum(elevation(db - 60 * np.maximum(t - s, 0) / t60) * (t > s) for s, db, t60 in ROLLS)
    crumbs = fractures(count=N, per_s=900, spread_db=3.0)
    colour = [(500, -14.5), (2100, 1), (4500, -14)]  # frequency_hz, density_db
    return amount * grains(crumbs, colour, 900, 3400, count=8, octaves=.12, per_s=69, depth_db=4.0)


def knock():
    return struck(5.9414, -36, KNOCK_MODES)


def moan():
    hz, db = curves([(6.5, 360, -110)] + MOAN_PATH + [(6.95, 453, -110)])
    breath = evened(resonate(resonate(noise(), hz, 45.), hz, 45.))
    return elevation(db - 2) * (np.sin(2 * np.pi * np.cumsum(hz) / SR) + .5 * breath)


def room(x):
    hz, t, z = signal.stft(rng.standard_normal(SR // 4), SR, nperseg=128)
    tail = signal.istft(z * elevation(-60 * t / read(ROOM_T60, hz)[:, None]), SR, nperseg=128)[1]
    tail = np.concatenate([np.zeros(90), tail])
    return signal.oaconvolve(x, tail / np.linalg.norm(tail))[:N]


def scene():
    background = rumble() + hiss() + hum() + moan()
    breaks = cracks()
    near = strokes(breaks) + breaks + grit() + clink()
    table = landings()
    reflected = room(elevation(-23) * near + elevation(-14.5) * table)
    dry_sources = chips() + jolts() + rolling() + knock()
    return (background + near + table + reflected + dry_sources)[None]


def top_cut(x):
    return signal.sosfilt(signal.butter(12, 14980, fs=SR, output="sos"), x)


def record(dry):
    lowpass = signal.firwin(151, 14000, window=("kaiser", 2.5), fs=SR)
    limited = signal.oaconvolve(dry, lowpass[None], "same")
    return top_cut(limited)


dry = scene()
out = record(dry)
transcribe(out)
```